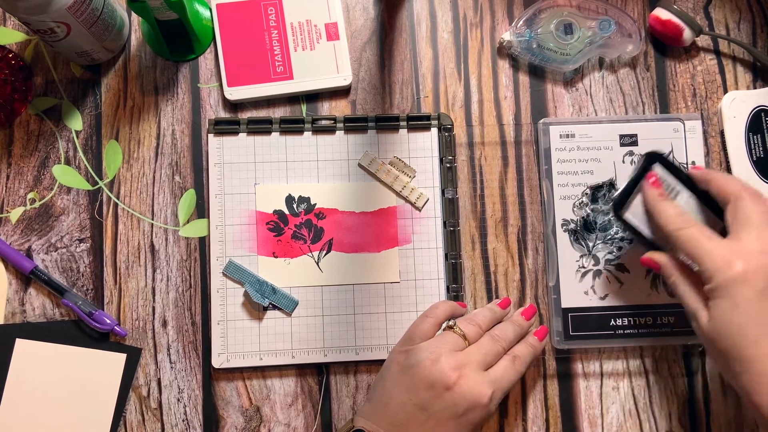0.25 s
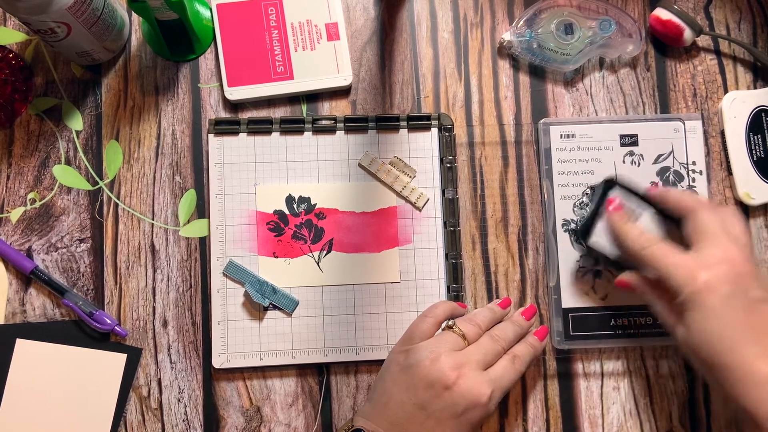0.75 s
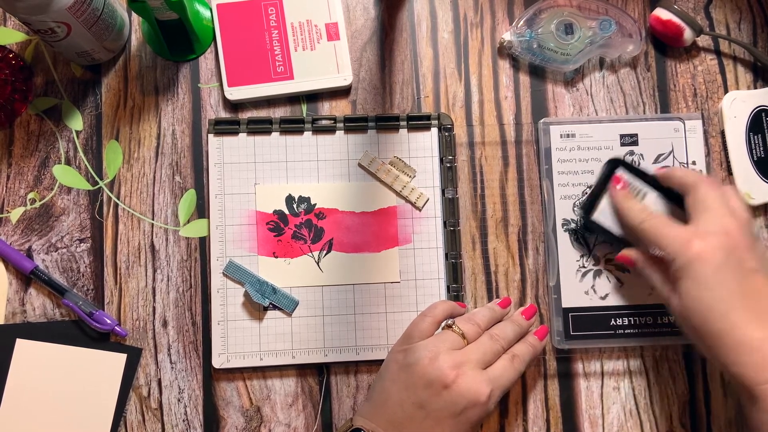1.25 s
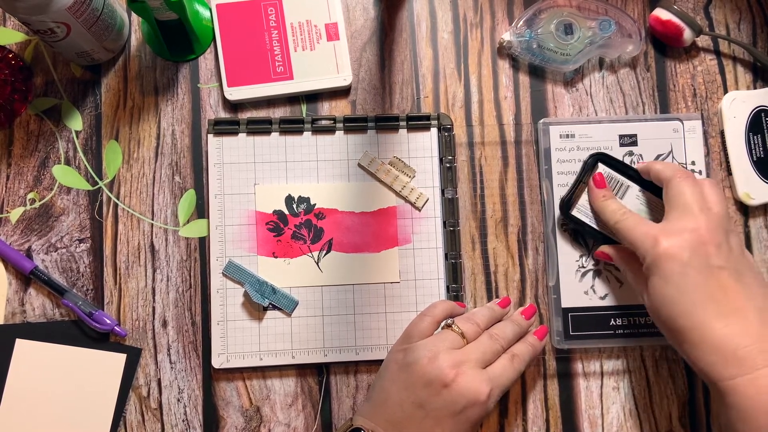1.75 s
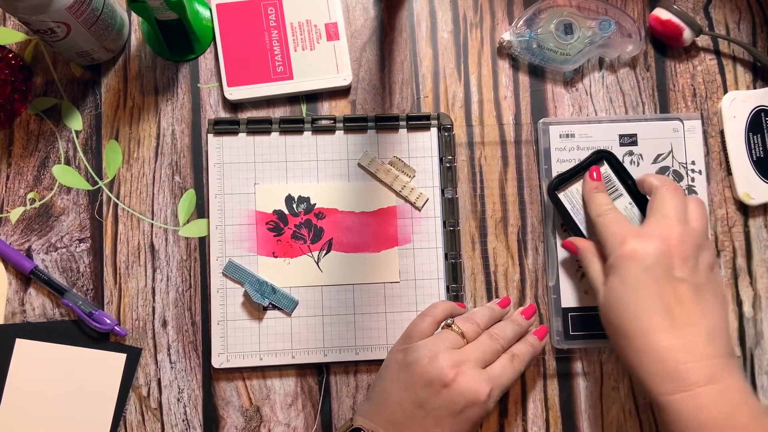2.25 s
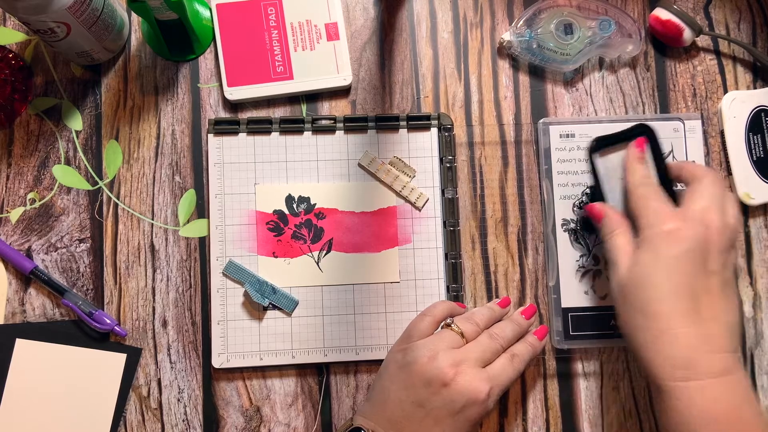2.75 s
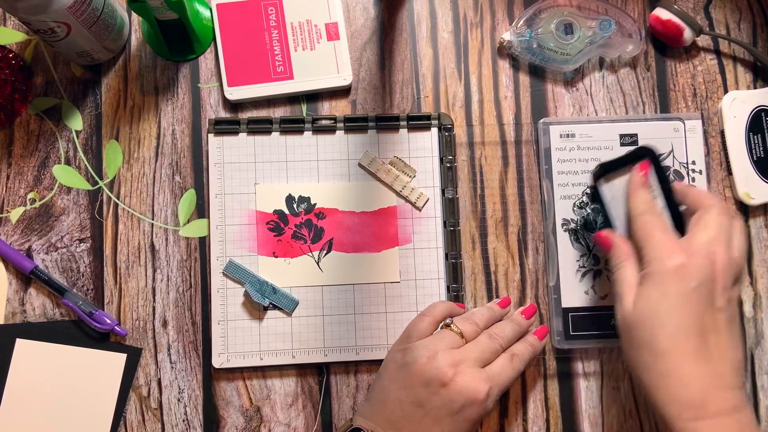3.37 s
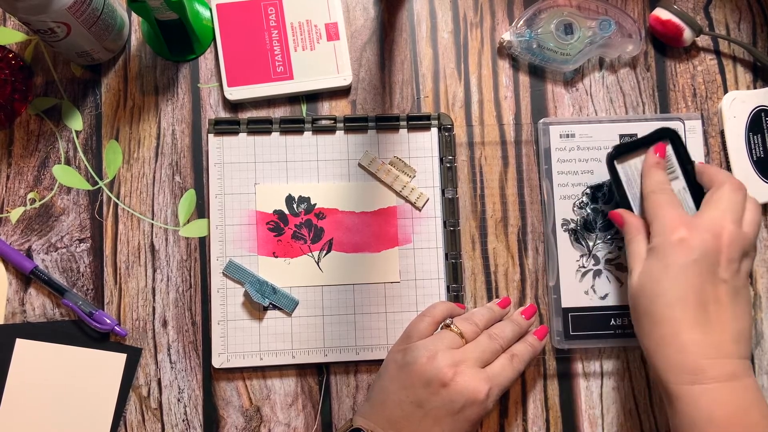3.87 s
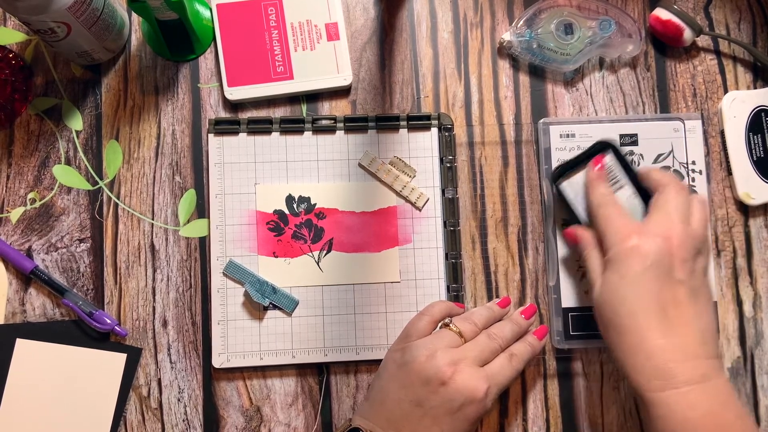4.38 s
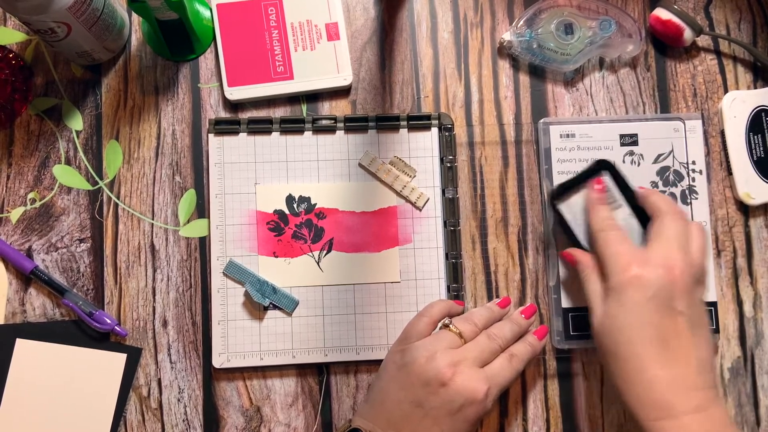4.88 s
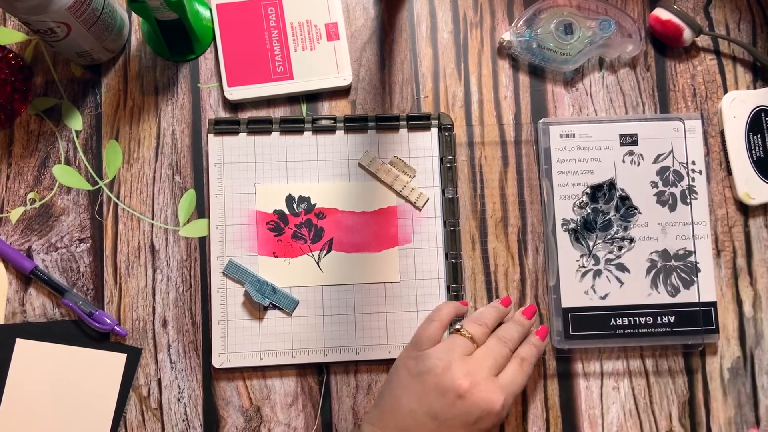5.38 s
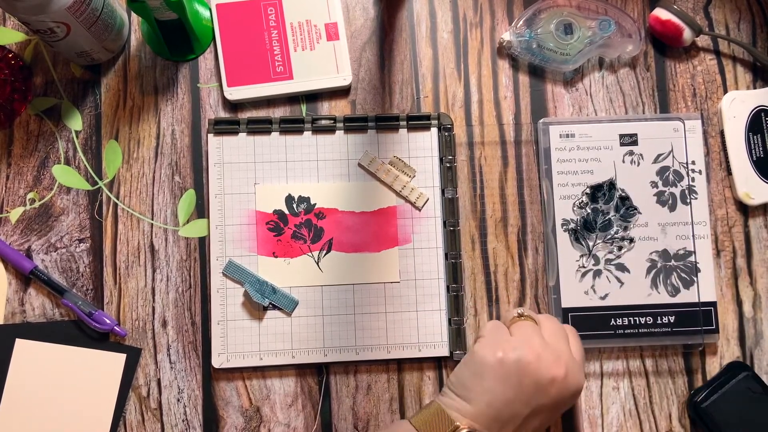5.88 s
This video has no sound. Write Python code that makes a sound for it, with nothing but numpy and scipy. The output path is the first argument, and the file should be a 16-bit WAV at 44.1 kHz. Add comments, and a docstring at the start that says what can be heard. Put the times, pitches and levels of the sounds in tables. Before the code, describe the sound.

Close, dry tapping at a craft table: eight clear hollow plastic knocks and one barely heard touch, unhurried at first, softer midway, then faster and louder. Sticky ink peels with tiny snaps between them. After a short pause, a hand bumps the table and case, skin hisses briefly over the surface, and a small hard plastic box slaps down and rattles. Small room, faint low air noise.

```python
"""In a small dry room, a small plastic ink pad is dabbed onto a clear stamp on its hollow case on a table.
Each dab is a soft landing that flexes the lid and shakes the table, then a clack of the rim.
The tacky ink crackles as the pad lifts: a swelling shower of tiny snaps. Knocks are fading sine waves.
At the end a hand bumps and slides over the table, in shaped noise, and the pad is put down with a clatter.
Dense fading echoes and a faint steady air noise make the room."""
import sys
import numpy as np
from scipy import signal
from scipy.fft import rfft, irfft, next_fast_len
from scipy.io import wavfile

SR = 44100
rng = np.random.default_rng(int(sys.argv[2]) if len(sys.argv) > 2 else 0)


def generate_wav(sig):
    """Save sig (samples, or channels by samples) to the path in sys.argv[1] as 16-bit PCM at SR."""
    pcm = np.round(np.clip(np.atleast_2d(sig).T, -1, 1) * 32767).astype(np.int16)
    wavfile.write(sys.argv[1], SR, pcm)


N = 269451   # length of the scene in samples
RING_TIME = np.arange(SR // 2) / SR   # the half second (s) that one knock or echo may last

# the pad lands on one edge and tips until its rim hits:
# [start_s, table_db, lid_db, lid_pitch_hz (at that spot), tipping_time_s, rim_db,
#  contact_brightness_hz, favoured_pitch_hz (of the rim's spot)]
DAB_LIST = [(0.4018, -26.5, -17, 708, .011, -22, 1920, 584),
            (0.9722, -26.5, -23, 301, 0.012, -22.5, 2390, 624),
            (1.5514, -28, -25, 261, 0.009, -22.5, 2630, 710),
            (2.207, -36, -48.5, 305, 0.064, -43, 3000, 900),
            (2.875, -28, -31, 433, .0052, -28.5, 2550, 450),
            (3.513, -28, -34, 647, 0.0048, -34.5, 1850, 850),
            (4.032, -23.5, -17, 270, .0056, -19, 5660, 1123),
            (4.4019, -24.5, -21.5, 359.5, 0.0057, -21, 5940, 486),
            (4.6763, -25.5, -14.5, 451.6, 0.0043, -21.5, 2150, 450)]
STIFF_HZ, SLACK_LOSS_DB = 605, 9.5   # lid pitch where stiff; the edge's knock loses this per octave below
EDGE_DB, EDGE_HZ = -8, 1200   # dull knock of the first edge, against the lid; its brightness
FLAT_TIP_S, FLAT_TICK_DB = 0.007, -9   # a nearly flat landing ticks, against the rim
TILT_LOSS_DB = 24   # loss of that tick per doubling of the tipping time
HARD_HZ, HARD_TICK_DB, SOFT_LOSS_DB = 6500, -3, 12   # rim tick; loss per octave of duller contact
SHELL_DB = -8.5   # the pad's own shell rings along, against the rim


def dabs(scrunch_db=-18, squeeze_max_s=0.0078, tick_t60=0.016):
    """One edge pushes the lid in, the foam is squeezed, then the rim clacks; flat, hard landings tick most."""
    out = np.zeros((2, N))
    presses = []
    for s, table_db, lid_db, lid_hz, tip_s, rim_db, bright_hz, spot_hz in DAB_LIST:
        edge_db = lid_db + EDGE_DB - SLACK_LOSS_DB * np.log2(max(STIFF_HZ / lid_hz, 1))
        edge_tick_db = rim_db + FLAT_TICK_DB - TILT_LOSS_DB * np.log2(max(tip_s / FLAT_TIP_S, 1))
        rim_tick_db = rim_db + HARD_TICK_DB - SOFT_LOSS_DB * np.log2(HARD_HZ / bright_hz)
        edge = from_db(edge_db) * clack(EDGE_HZ, spot_hz)
        edge = edge + from_db(edge_tick_db) * crack(tick_t60)
        add(out, s, edge + flex(lid_db, lid_hz, table_db))
        shell = soften(strike(PAD_RINGS, beam_hz=2800), bright_hz)
        rim = clack(bright_hz, spot_hz) + from_db(SHELL_DB) * shell
        add(out, s + tip_s, from_db(rim_db) * rim + from_db(rim_tick_db) * crack(tick_t60))
        presses.append((s + min(tip_s, squeeze_max_s) / 2, rim_db + scrunch_db))
    return out + scrunch(presses)


# how the hollow case rings: [pitch_hz, level_db, fade_time_s (to fall 60 dB)]
CASE_RINGS = [(244, -3.5, 0.031), (454, 1, 0.021), (578, 3, 0.019), (695, 2, 0.015), (867, -5, 0.037),
              (1026, -1, 0.018), (1450, -13.5, 0.004), (2080, -13, .011), (2380, -9, .013),
              (2780, -8, .013), (3250, -11, .011), (4250, -14, .009), (5400, -33, 0.0035),
              (6500, -7, 0.015)]


def clack(bright_hz, spot_hz, crack_db=-4, spot_db=5, spot_octaves=0.24):
    """A hard knock rings the hollow case, most of all the modes that swing widest at the struck spot."""
    modes = []
    for hz, level, t60 in CASE_RINGS:
        octaves_away = np.log2(hz / spot_hz)
        boost_db = spot_db * np.exp(-(octaves_away / spot_octaves) ** 2)
        modes.append((hz, level + boost_db, t60))
    knock = strike(modes, beam_hz=3180) + from_db(crack_db) * crack(t60=0.022)
    return soften(knock, bright_hz)


# how the table booms: [pitch_hz, level_db, fade_time_s (to fall 60 dB)]
TABLE_RINGS = [(47, -11, 0.31), (64.6, -5.5, 0.21), (80.2, -8, 0.27), (115.8, 3.5, 0.16),
               (142.2, -10, 0.25), (186.64, -7.5, 0.27), (214, -12.5, 0.23), (285.3, -13, .16)]


def flex(lid_db, lid_hz, table_db, lid_t60=0.031, press_cycles=.5, table_rise_s=0.0075, table_lag_s=0.0028):
    """A soft push flexes the plastic, more slowly where it is slack; the heavy table follows more slowly."""
    press = 1 - np.exp(-RING_TIME * lid_hz / press_cycles)
    lid = np.sin(2 * np.pi * lid_hz * RING_TIME) * fade(lid_t60) * press
    boom = strike(TABLE_RINGS, beam_hz=900) * (1 - np.exp(-RING_TIME / table_rise_s))
    late_boom = np.pad(boom, ((0, 0), (int(table_lag_s * SR), 0)))[:, :len(RING_TIME)]
    return from_db(lid_db) * lid / lid.max() + from_db(table_db) * late_boom


# tone colour of squeezed foam or skin: [pitch_hz, level_db (per Hz)]
FOAM_COLOUR = [(150, 7.5), (600, 9.5), (1100, 7), (1600, -3.5), (2500, -4.5), (6000, -18), (10000, -18.5),
               (13000, -21), (16000, -23)]


def scrunch(presses, touch_s=0.0075, crush_s=0.018, crush_lag_s=0.0009):
    """Foam or skin scrunches as it is squeezed, at each (start_s, level_db): a burst of tiny snaps."""
    squeeze = sum(from_db(db) * surge(s + crush_lag_s, touch_s, crush_s) for s, db in presses)
    return squeeze * diffuse(grains(per_s=12000, spread_db=4.5), FOAM_COLOUR)


# tone colour of a hard contact: [pitch_hz, level_db (per Hz)]
TICK_COLOUR = [(400, -19), (1500, 4.5), (3000, -2), (6000, -0.5), (8500, -8.5), (10500, -10.5),
               (13000, -12.5), (16000, -11.5)]


def crack(t60):
    """The brief bright burst of many high modes at a hard contact, made of fading noise."""
    return diffuse(rng.standard_normal((2, len(RING_TIME))), TICK_COLOUR) * fade(t60)


# the pad lifts off the tacky ink:
# [release_s, crackle_db, build_up_s, thump_db (of the spring-back), lid_pitch_hz]
LIFT_LIST = [(0.048, -46.5, .0046, -44, 555), (0.671, -47, .0098, -54, 600), (1.236, -45, .0046, -42, 260),
             (1.807, -46.5, .012, -44.5, 256), (2.490, -42, .005, -43.5, 578),
             (3.149, -43.5, .0052, -48, 605), (3.694, -54.5, .0069, -60, 600),
             (4.228, -61, .029, -66.5, 304), (4.572, -52.5, .0036, -42, 200), (4.850, -55, .0034, -47, 640)]
# tone colour of the snapping ink: [pitch_hz, level_db (per Hz)]
INK_COLOUR = [(150, -6), (600, 13), (1000, 5.5), (1600, -12.5), (2400, 1.5), (4500, -3.5), (7000, -2),
              (10000, -8), (13000, -6.5), (16000, -21.5)]


def lifts(release_s=0.0084, pluck_db=-2, quick_s=0.0031, lid_db=-7):
    """Ink threads snap harder until the pad comes free and the lid springs back; quick pulls pluck most."""
    pull = sum(from_db(db) * surge(s, build_s, release_s) for s, db, build_s, _, _ in LIFT_LIST)
    threads = grains(per_s=2200, spread_db=3.8)
    out = pull * diffuse(threads, INK_COLOUR)
    for s, db, build_s, thump_db, lid_hz in LIFT_LIST:
        quickness = min(quick_s / build_s, 1)
        pluck = from_db(db + pluck_db) * quickness * strike(CASE_RINGS, beam_hz=3330)
        add(out, s, pluck + flex(thump_db + lid_db, lid_hz, thump_db))
    return out


# how the pad's shell rings: [pitch_hz, level_db, fade_time_s (to fall 60 dB)]
PAD_RINGS = [(982, -22, 0.088), (1227, -17.5, 0.044), (1530, -26.5, .018), (1920, -11, .022),
             (2230, 1, .026), (2700, -7, .022), (3040, -9.5, 0.016), (3806, -12.5, 0.012),
             (4300, -14.5, 0.015), (4560, -13, 0.004), (5360, -20.5, 0.011), (6540, -30.5, 0.0067),
             (8660, -14, 0.0097)]
# the pad is put down corner first, slaps flat and rocks to rest
SET_DOWN_S, SET_DOWN_DB, SET_DOWN_HZ = 5.956, -12, 14400   # slap: time, level, contact brightness
CORNER_LEAD_S, CORNER_DB, CORNER_HZ = 0.0054, -22.5, 5000   # the corner's touch just before it
ROCK_S, ROCK_LOSS_DB, ROCK_DULLING = .0037, 2.5, 0.64   # per contact: mean gap, loss, brightness ratio


def set_down(crack_db=5, crack_t60=0.0073, shell_db=-2, scrunch_db=-27, count=5):
    """The bare shell slaps and clatters on the table at uneven gaps, each rock weaker and duller."""
    out = scrunch([(SET_DOWN_S, scrunch_db)])
    add(out, SET_DOWN_S, flex(lid_db=-30, lid_hz=307, table_db=-31.5))
    contacts = [(SET_DOWN_S - CORNER_LEAD_S, CORNER_DB, CORNER_HZ), (SET_DOWN_S, SET_DOWN_DB, SET_DOWN_HZ)]
    for k in range(1, count):
        s = SET_DOWN_S + ROCK_S * (k + rng.uniform(-.3, .3))
        contacts.append((s, SET_DOWN_DB - k * ROCK_LOSS_DB, SET_DOWN_HZ * ROCK_DULLING ** k))
    for s, db, bright_hz in contacts:
        shell = from_db(shell_db) * strike(PAD_RINGS, beam_hz=2830)
        shell = shell + from_db(crack_db) * crack(crack_t60)
        add(out, s, from_db(db) * soften(shell, bright_hz))
    return out


# the hand bumps the table: [start_s, level_db, pitch_hz]
BUMP_LIST = [(5.5415, -23.5, 665), (5.553, -23.5, 298), (5.85, -50, 195)]
# the case is jogged and knocks on the table: [start_s, level_db]
KNOCK_LIST = [(3.5479, -43.5), (5.5399, -24.5), (5.5463, -28), (5.559, -28), (5.824, -48)]
KNOCK_HZ, KNOCK_SPOT_HZ = 1600, 900   # contact brightness; pitch that the spot favours
# dry ticks of fingernails: [start_s, level_db]
NAIL_TICKS = [(3.696, -54.5), (4.571, -45.5), (4.9789, -54.5), (5.581, -56), (5.692, -49.5), (5.823, -45.5)]


def bumps(table_db=-8.5, scrunch_db=-19):
    """Stray contacts: hand bumps flex and scrunch, case knocks ring, fingernail ticks are bare cracks."""
    out = scrunch([(s, db + scrunch_db) for s, db, _ in BUMP_LIST])
    for s, db, hz in BUMP_LIST:
        add(out, s, flex(db, hz, db + table_db))
    for s, db in KNOCK_LIST:
        add(out, s, from_db(db) * clack(KNOCK_HZ, KNOCK_SPOT_HZ))
    for s, db in NAIL_TICKS:
        add(out, s, from_db(db) * crack(t60=0.012))
    return out


# strokes of the hand over the table: [full_strength_s, hold_s, dry_hiss_db, dull_rub_db]
STROKE_LIST = [(5.276, 0.23, -76.5, -68.5), (5.573, 0.032, -50.5, -46), (5.67, 0.074, -51, -57),
               (5.786, 0.012, -71, -52.5), (5.835, 0.019, -60.5, -54), (5.892, 0.014, -61, -52)]
# tone colours of the dry hiss and of the dull rub: [pitch_hz, level_db (per Hz)]
SKIN_COLOUR = [(500, 3), (2000, -42), (3500, -6), (5000, -3), (7500, 1.5), (8800, 6), (11000, -2),
               (14000, -1), (16000, -6)]
RUB_COLOUR = [(100, 12), (400, -1), (900, 3), (1500, -6), (2500, -7), (5000, -21.5), (12000, -38)]
STROKE_SWELL, STROKE_RELEASE_S = 0.29, 0.021   # build-up as a share of the hold; letting go


def slide():
    """Skin catches and slips on the table top in a fine hiss; the weight of the arm adds a duller rub."""
    hiss, rub = 0, 0
    for s, hold_s, hiss_db, rub_db in STROKE_LIST:
        speed = surge(s, STROKE_SWELL * hold_s, STROKE_RELEASE_S, hold_s)
        hiss = hiss + from_db(hiss_db) * speed
        rub = rub + from_db(rub_db) * speed
    fine = diffuse(grains(per_s=14000, spread_db=6.0), SKIN_COLOUR)
    dull = diffuse(grains(per_s=2000, spread_db=2.0), RUB_COLOUR)
    return hiss * fine + rub * dull


# how long echoes last: [pitch_hz, fade_time_s (to fall 60 dB; below zero they grow instead)]
ECHO_TIMES = [(60, .5), (150, 0.38), (400, 0.2757), (1000, 0.2359), (2400, 0.32), (5000, 0.26),
              (8000, 0.08), (14000, -2.05)]
# how loud echoes are: [pitch_hz, level_db (against the direct sound)]
ECHO_LEVELS = [(50, -6.5), (120, -9.5), (300, -5), (700, -11), (1500, -5.5), (2500, -8.5), (5000, -6),
               (8000, -11), (14000, -28.5)]


def room(x, first_echo_s=0.0054, build_s=0.00079, count=12):
    """Dense echoes change at their own rate in each band; their pattern varies as the hand moves about."""
    size = len(RING_TIME)
    centres = np.geomspace(50, 16000, 14)   # middle of each pitch band, Hz
    hz = np.fft.rfftfreq(size, 1 / SR)
    bands = np.array([at_hz(list(zip(centres, pick)), hz) for pick in np.eye(len(centres))])
    swell = 1 - np.exp(-np.maximum(RING_TIME - first_echo_s, 0) / build_s)
    decays = swell * fade(at_hz(ECHO_TIMES, centres)[:, None])
    gains = from_db(at_hz(ECHO_LEVELS, centres)) * np.sqrt(np.mean(bands ** 2, axis=1) / size)
    out = np.zeros((2, N))
    # a fresh random echo pattern for each equal stretch of the scene
    for stretch in np.array_split(np.arange(N), count):
        echoes = rfft(diffuse(rng.standard_normal((2, size))))
        response = 0
        for gain, band, decay in zip(gains, bands, decays):
            response = response + gain * rms_one(irfft(echoes * band, size) * decay)
        add(out, stretch[0] / SR, signal.fftconvolve(x[:, stretch], response, axes=1))
    return out


# tone colour of the room's air: [pitch_hz, level_db (per Hz)]
AIR_COLOUR = [(20, -25), (40, -1.5), (62, 1.5), (120, -3), (250, -9.5), (500, -19), (1000, -22.5),
              (1900, -28), (2350, -25.5), (2900, -30.5), (5000, -31), (8000, -32), (14000, -33.5),
              (16000, -45.5)]


def air(level_db=-62):
    """The steady air of the room: faint shaped noise."""
    return from_db(level_db) * diffuse(rng.standard_normal((2, N)), AIR_COLOUR)


MODE_SCATTER_DB, MODE_DETUNE = 1.2, .018   # random spread of each ring's level, and of its pitch as a share
RIGHT_LAG_S = .00005   # a blow reaches the right side this much later


def strike(modes, beam_hz):
    """One blow: the grip shifts each ring a little; higher ones reach the two sides more out of step."""
    out = np.zeros((2, len(RING_TIME)))
    arrival = np.maximum(RING_TIME - np.array([[0], [RIGHT_LAG_S]]), 0)
    for k, (hz, db, t60) in enumerate(modes):
        strength = from_db(db + MODE_SCATTER_DB * rng.normal()) * (-1) ** k
        # the random phase grows with pitch up to beam_hz
        skew = rng.normal(size=(2, 1)) * min(hz / beam_hz, 1) ** 2
        pitch = hz * (1 + MODE_DETUNE * rng.normal())
        size = int(2 * t60 * SR)
        wave = np.sin(2 * np.pi * pitch * arrival[:, :size] + skew)
        out[:, :size] += strength * wave * fade(t60)[:size]
    return out


def surge(peak_s, build_s, release_s, hold_s=0):
    """A force that builds up to its peak, holds and then lets go."""
    t = np.arange(N) / SR - peak_s
    away = np.maximum(-t / build_s, (t - hold_s) / release_s)
    return np.exp(-np.clip(away, 0, 20))


def grains(per_s, spread_db):
    """Two streams of tiny snaps of uneven size, at random moments."""
    sizes = from_db(spread_db * np.minimum(rng.exponential(1, (2, N)), 4))
    return (rng.random((2, N)) < per_s / SR) * sizes * rng.choice([-1, 1], (2, N))


def soften(x, hz):
    """A longer contact passes less treble."""
    return signal.sosfilt(signal.butter(2, min(hz, .45 * SR), fs=SR, output="sos"), x)


# how alike left and right are: [pitch_hz, correlation (kept within -1 and 1 when used)]
SIDE_LIKENESS = [(100, 0.91), (300, 0.79), (800, 0.05), (2000, 0.26), (4500, 0.093), (8500, -0.4),
                 (10000, -2), (12000, 0.96), (16000, 0.29)]


def diffuse(pair, spectrum=None):
    """Two unrelated signals become a stereo field of the given colour, at unit power."""
    size = pair.shape[-1]
    padded = next_fast_len(size)
    hz = np.fft.rfftfreq(padded, 1 / SR)
    colour = 1 if spectrum is None else from_db(at_hz(spectrum, hz))
    mid, side = rfft(pair, padded) * colour
    alike = np.clip(at_hz(SIDE_LIKENESS, hz), -1, 1)
    mid = mid * np.sqrt(1 + alike)
    side = side * np.sqrt(1 - alike)
    return rms_one(irfft(np.array([mid + side, mid - side]), padded)[:, :size])


def from_db(db):
    """Decibels to gain."""
    return 10 ** (np.asarray(db) / 20)


def rms_one(x):
    """Scale to unit power."""
    return x / np.sqrt(np.mean(x ** 2) + 1e-20)


def at_hz(points, hz):
    """Read a table between its points, on a log-frequency axis."""
    known_hz, values = np.transpose(points)
    return np.interp(np.log(np.maximum(hz, 1)), np.log(known_hz), values)


def fade(t60):
    """Exponential change: 60 dB down after t60 seconds, or growing if t60 is negative."""
    return np.exp(-np.log(1000) * RING_TIME / t60)


def add(out, s, sound):
    """Mix a sound in at time s, in seconds."""
    start = int(round(s * SR))
    out[:, start:start + sound.shape[-1]] += sound[..., :max(N - start, 0)]


LEFT_DB = 0.76   # direct sound: left raised and right lowered by this


def scene():
    """All handling sounds, a little stronger on the left, with the room and its steady air."""
    handling = dabs() + lifts() + bumps() + slide() + set_down()
    direct = handling * from_db([[LEFT_DB], [-LEFT_DB]])
    return direct + room(handling) + air()


def record(dry, cutoff_hz=15900):
    """The microphone drops the deepest bass; the top is cut steeply."""
    thinned = signal.sosfilt(signal.butter(2, 38, "high", fs=SR, output="sos"), dry)
    return signal.sosfilt(signal.ellip(10, .1, 80, cutoff_hz, fs=SR, output="sos"), thinned)


dry = scene()
out = record(dry)
generate_wav(out)
```